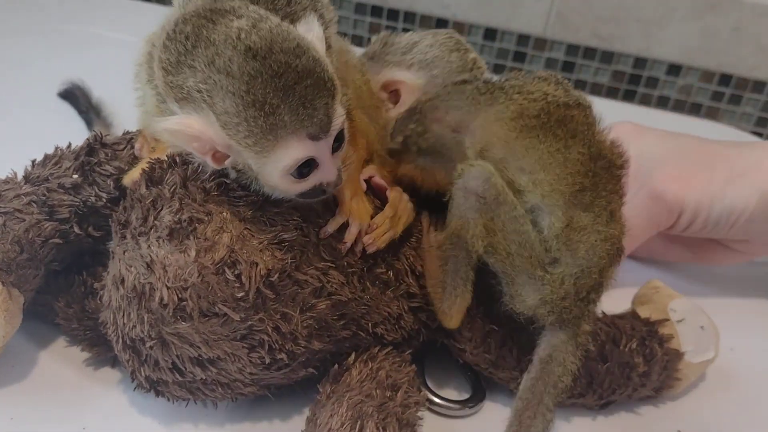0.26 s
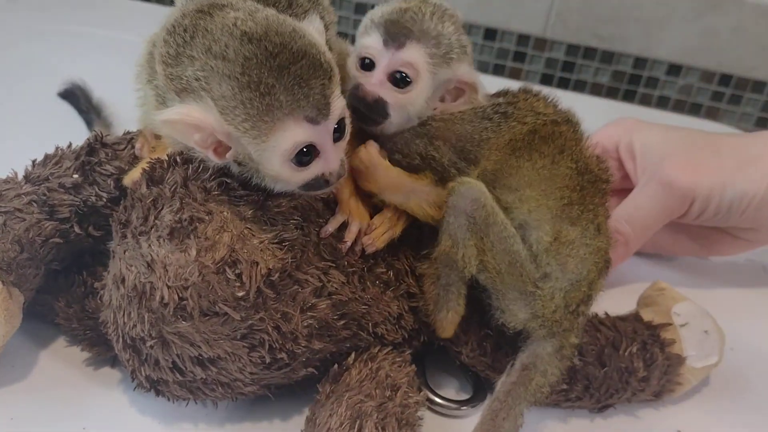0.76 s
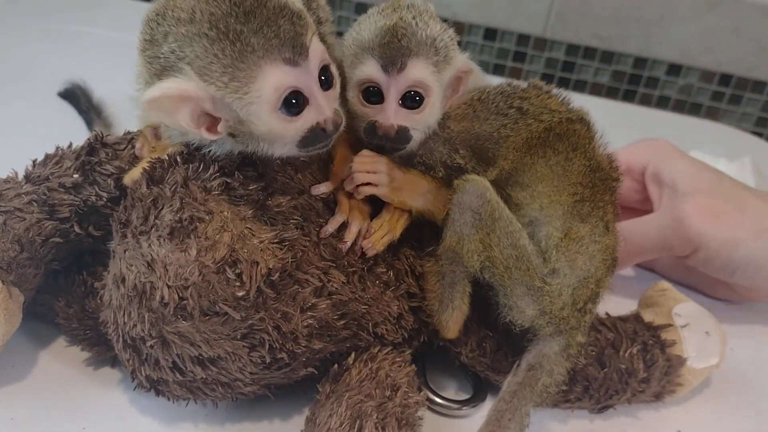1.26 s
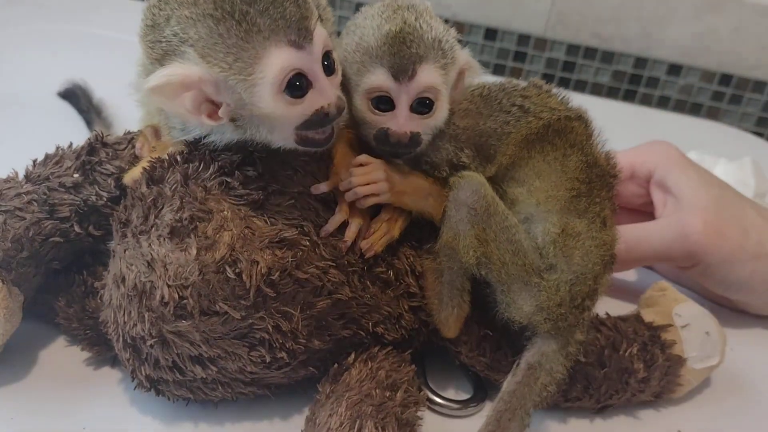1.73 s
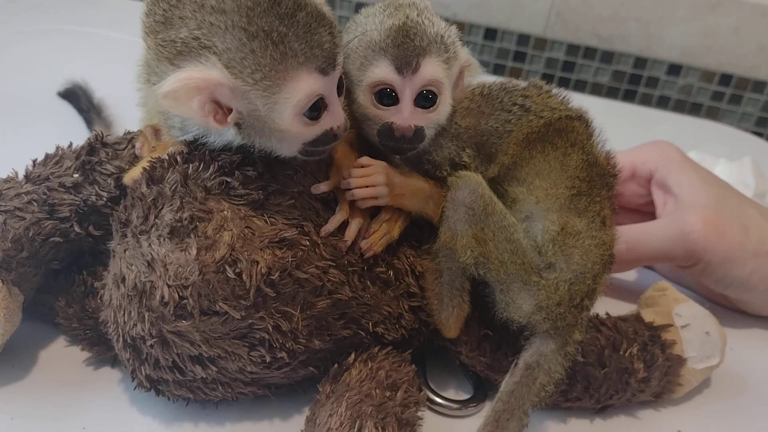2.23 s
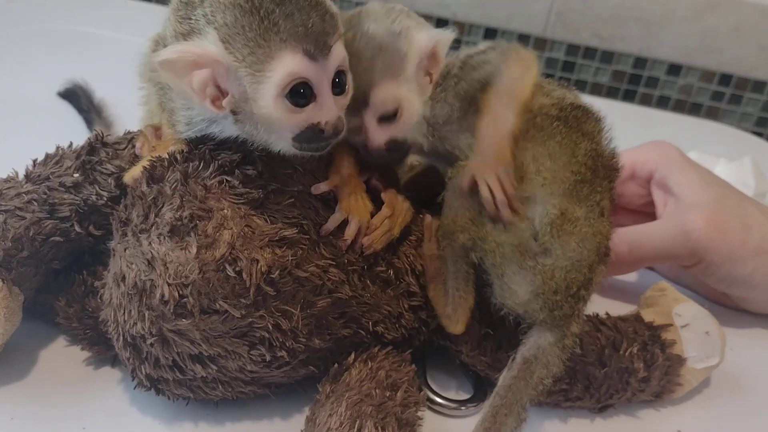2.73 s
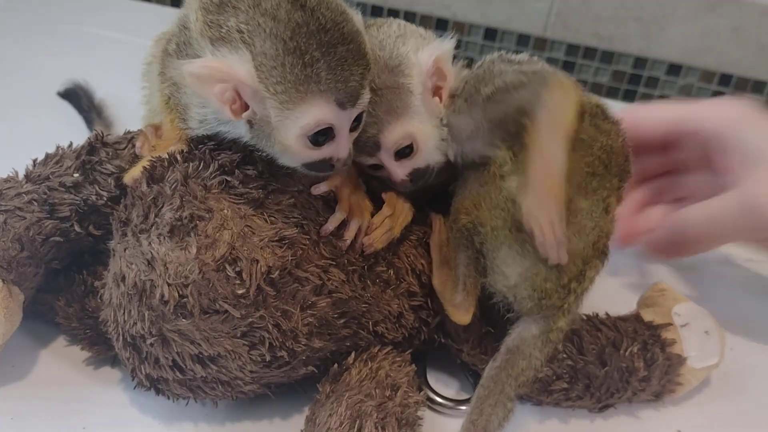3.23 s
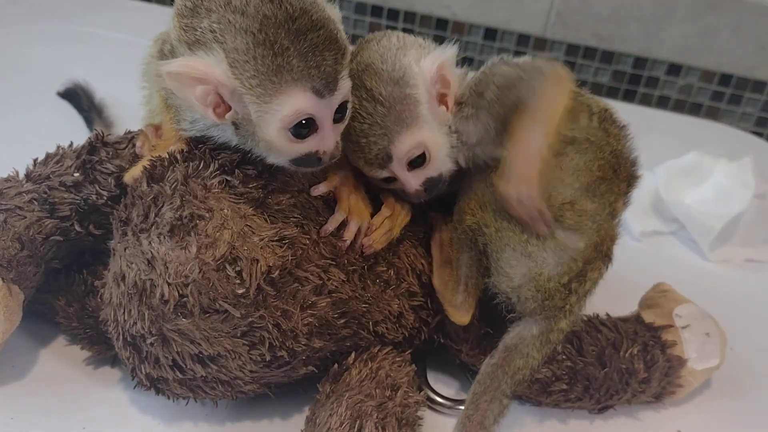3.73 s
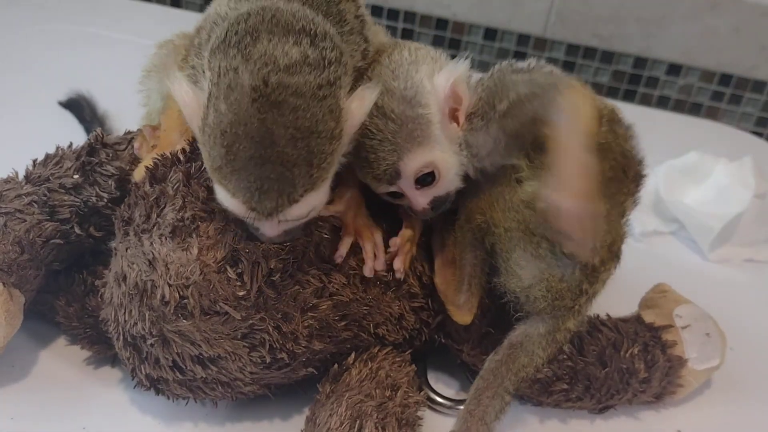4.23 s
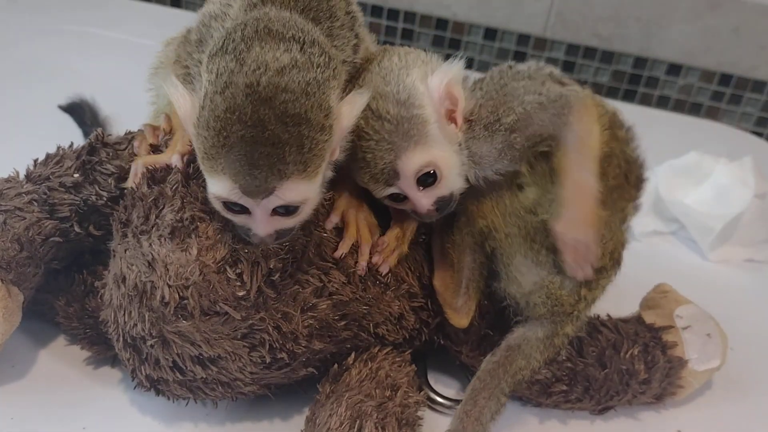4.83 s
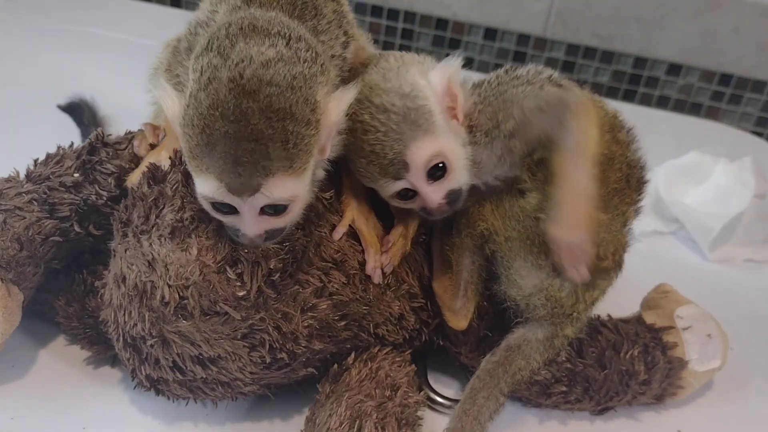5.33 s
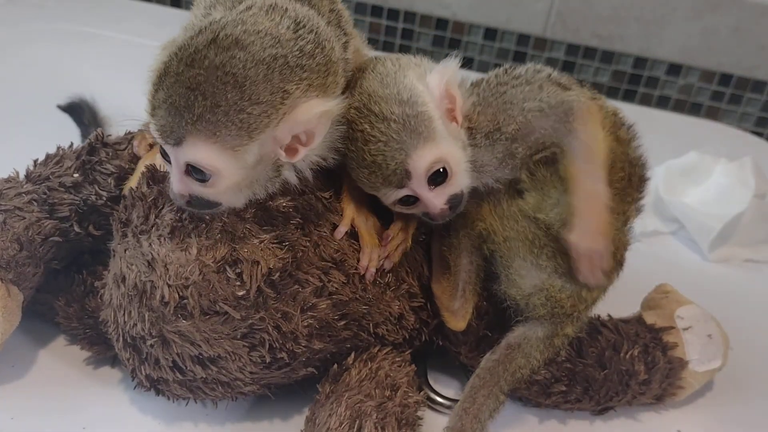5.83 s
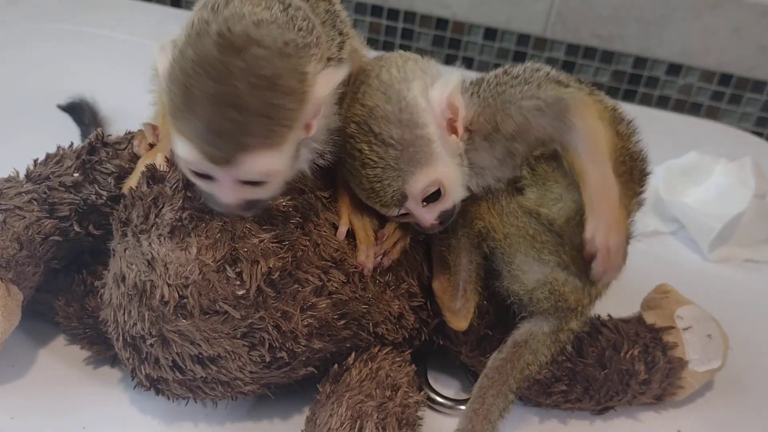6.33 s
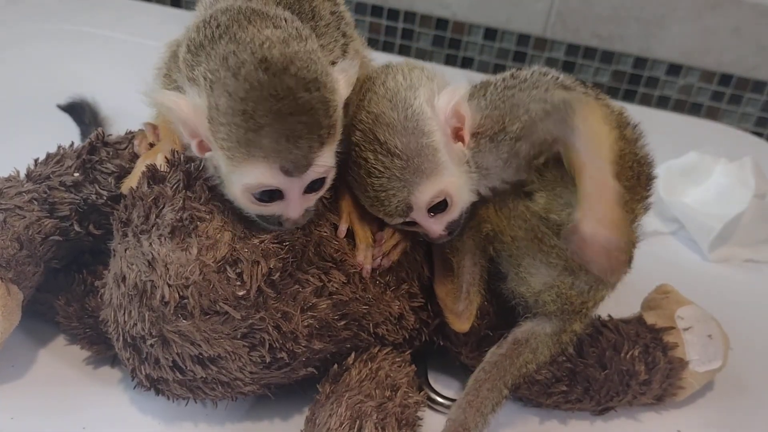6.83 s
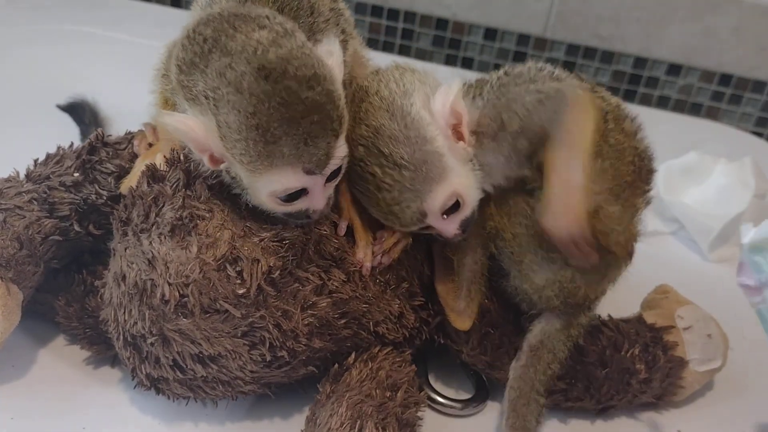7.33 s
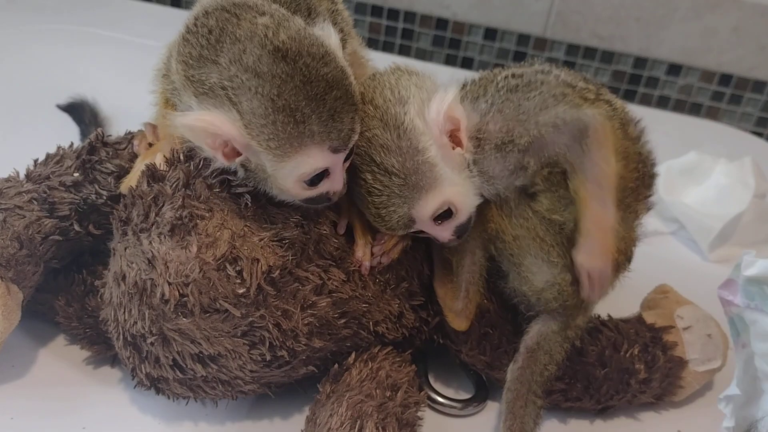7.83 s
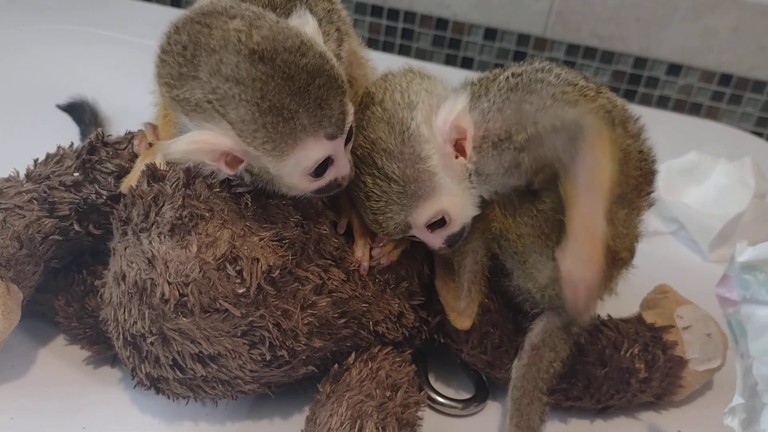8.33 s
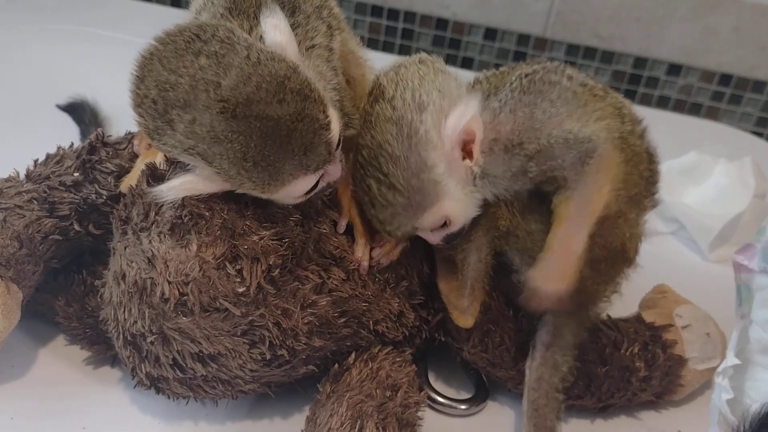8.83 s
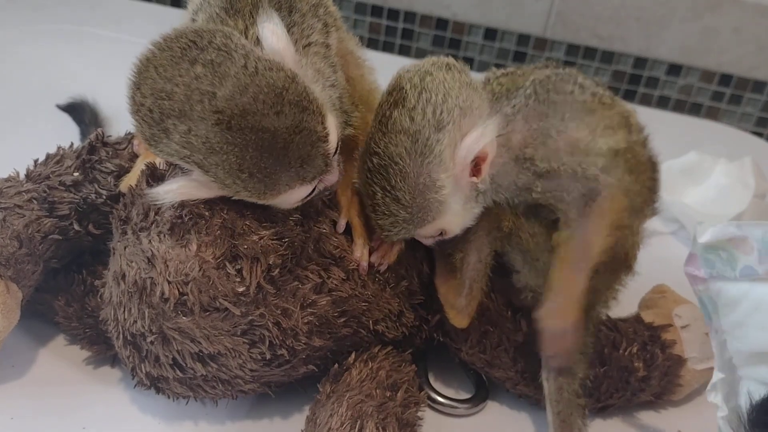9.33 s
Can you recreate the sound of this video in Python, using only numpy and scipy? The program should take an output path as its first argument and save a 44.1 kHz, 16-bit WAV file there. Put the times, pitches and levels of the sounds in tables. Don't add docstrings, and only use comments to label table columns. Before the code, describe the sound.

A small tiled washroom, close stereo pickup, faint ventilation rush with low wavering fan hum throughout. At 0 and 0.9 s, infant monkeys give soft, buzzy low grunts; at 1.4 s a dull bump sounds on a hollow basin. From 1.8 to 2.6 s comes a cluster of four tiny, nearly pure whistles, very high, the loudest near 2.5 s, followed by a higher, longer one, with bright scratching of fur. A creaky grunt at 3.4 s leads into dry claw rustle and scattered ticks until about 5.4 s, then a lull. From 6.2 to 6.9 s weight drags, squeaks, clacks and thuds on the basin, with three short peeps. Scratching returns at 7.2 s, strongest near 7.7. At 8.2 s a sharp falling chuck turns raspy, followed at once by a breathy grunt. Duller rubbing and fine snaps dwindle to 9.5 s. Every call leaves a brief tile echo.

```python
import sys
import numpy as np
from scipy import signal
from scipy.fft import rfft, irfft
from scipy.io import wavfile
from scipy.ndimage import uniform_filter1d

SR = 44100
rng = np.random.default_rng(int(sys.argv[2]) if len(sys.argv) > 2 else 0)


def unload_wav(signal):
    wavfile.write(
        sys.argv[1],
        SR,
        np.round(np.clip(np.atleast_2d(signal).T, -1, 1) * 32767).astype(np.int16),
    )


def ratio_of_db(decibels):
    return 10 ** (np.asarray(decibels, float) / 20)


N = 422919

ATTACK_S = 0.005

# (pitch [Hz], width [Hz], level [dB])
BASIN_WALL = [(580, 350, 3), (998, 700, -1), (1800, 1100, -5)]
# (pitch [Hz], width [Hz], level [dB])
BASIN_GLAZE = [(2660, 600, 3), (3180, 700, -2), (4180, 2100, -10.5)]


def unit(x):
    return x / np.sqrt(np.mean(x ** 2))


def along(table, hz):
    table_hz, value = np.transpose(table)
    return np.interp(np.log(hz + 1), np.log(table_hz), value)


def unroll(table):
    s, *columns = np.transpose(table)
    t = np.arange(s[0], s[-1], 1 / SR)
    return [np.interp(t, s, column) for column in columns]


def walk(rate, size=N):
    k = int(SR / rate)
    goals = rng.standard_normal(size // k + 1)
    return uniform_filter1d(np.repeat(goals, k), k)[:size]


def strokes(rows):
    s, db, rise_s, fade_s = np.transpose(rows)[:, :, None]
    t = np.arange(0, N, 64) / SR
    below_peak_db = 20 * np.maximum((s - t) / rise_s, (t - s) / fade_s)
    power = ratio_of_db(2 * (db - below_peak_db)).sum(axis=0)
    return np.interp(np.arange(N) / SR, t, 10 * np.log10(power + 1e-13))


def ring(x, modes):
    out = 0
    for k, (hz, width, db) in enumerate(modes):
        peak = signal.tf2sos(*signal.iirpeak(hz, hz / width, fs=SR))
        out = out + (-1) ** k * ratio_of_db(db) * signal.sosfilt(np.vstack([peak, peak]), x)
    return out


def diffuse(size):
    # (pitch [Hz], likeness [-1 to 1])
    likeness = [(60, .87), (290, .7), (640, 0.2), (1400, -0.026), (2500, .0)]
    like = np.clip(along(likeness, np.fft.rfftfreq(size, 1 / SR)), -1, 1)
    noise = rfft(rng.standard_normal((2, size)))
    mid, side = noise * np.sqrt((1 + np.array([like, -like])) / 2)
    return irfft(np.array([mid + side, mid - side]), size)


def tiles(size=16384):
    # (pitch [Hz], time [s])
    fade_times = [(300, 0.26), (2000, 0.31), (6000, 0.24), (12000, 0.2013)]
    # (pitch [Hz], level [dB])
    echo_tone = [(500, -1), (2000, -0.5), (3500, -4.5), (6000, .0), (12000, -1)]
    hz, t = np.fft.rfftfreq(size, 1 / SR), np.arange(size) / SR
    echoes = rfft(diffuse(size)) * ratio_of_db(along(echo_tone, hz))
    bands = 250 * 4. ** np.arange(4)
    fades = ratio_of_db(-60 * t / along(fade_times, bands)[:, None])
    tail = 0
    for row, fade in zip(np.eye(4), fades):
        share = np.interp(np.log(hz + 1), np.log(bands), row)
        tail = tail + irfft(echoes * share, size) * fade
    tail = tail * np.clip((t - .009) / .003, 0, 1)
    return tail / np.sqrt(np.sum(tail ** 2) / 2)


def heard(x, pan_db, lag_ms, room_db, tail):
    rim_db, rim_lag = -9, 225
    side = np.array([[.5], [-.5]])
    delay = np.sinc(np.arange(-32, 32) - side * lag_ms * SR / 1000) * np.hanning(64)
    direct = ratio_of_db(side * pan_db) * delay
    path = ratio_of_db(room_db) * tail
    path[:, :64] += direct
    path[:, rim_lag:rim_lag + 64] += ratio_of_db(rim_db) * direct[::-1]
    return signal.oaconvolve(x[None], path, axes=1)[:, 32:]


def add(out, start_s, x):
    i = int(start_s * SR)
    out[:, i:i + x.shape[1]] += x[:, :N - i]


def ventilation():
    # (pitch [Hz], level per Hz [dB])
    air_colour = [(20, -28), (40, -6.5), (65, -1.5), (100, -3.5), (160, -8.5), (250, -10), (500, -11.5),
                  (1000, -14.5), (2000, -21.5), (4000, -29.5), (8000, -31), (13000, -33.5), (16000, -35)]
    # (pitch [Hz], level [dB], waver [dB])
    fan_tones = [(74.2, -76, 3), (136.4, -73, 2), (180, -78.5, 2), (299.4, -80, 3)]
    colour = ratio_of_db(along(air_colour, np.fft.rfftfreq(N, 1 / SR)))
    air = unit(irfft(rfft(diffuse(N)) * colour, N))
    tones = 0
    for hz, db, waver_db in fan_tones:
        level = np.sqrt(2) * ratio_of_db(db + waver_db * walk(14))
        tones = tones + level * np.sin(2 * np.pi * np.cumsum(hz + 1.8 * walk(11)) / SR)
    return ratio_of_db(-66 + 0.55 * walk(1.5)) * air + ratio_of_db(np.array([[.6], [-.6]])) * tones


def scratching():
    # (pitch [Hz], level per Hz [dB])
    fur_colour = [(470, -39.5), (800, -13.5), (1180, -9.5), (1290, -10), (1630, -9.5), (2290, -5),
                  (2600, -6.5), (3220, -6), (4130, -6), (7360, -9), (9100, -14), (10600, -12.5),
                  (13400, -16), (15200, -21), (16000, -27)]
    # (pitch [Hz], width [Hz], level [dB])
    pile_bands = [(2300, 200, 4), (3720, 300, 2)]
    # (peak time [s], peak level [dB], 20 dB rise [s], 20 dB fade [s])
    claw_strokes = [(.59, -81, .05, .15), (1.9, -69, .03, .3), (2.235, -60, .25, .06), (2.47, -60, .05, .4),
                    (2.7, -63, .4, .2), (3.268, -66.5, .03, .2), (3.56, -67, .2, .25),
                    (3.755, -66, .02, .3), (3.885, -65, .03, .15), (3.995, -64.5, .05, .4),
                    (4.095, -67, .02, .3), (4.23, -67, .3, .4), (4.42, -66, .03, .45), (7.54, -61, .15, .1),
                    (4.6, -64, .3, .15), (4.9, -72.5, .15, .1), (5.18, -68, .25, .25),
                    (5.35, -65, .015, .08), (5.6, -70, .3, .2), (7.056, -75, .01, .06),
                    (7.23, -63.5, .15, .35), (7.675, -52, .2, .04), (7.62, -59, .06, .1),
                    (7.82, -59, .012, .1), (7.848, -57.5, .05, .14), (7.737, -62, .012, .07),
                    (7.97, -62, .1, .15), (8.075, -61, .06, .05), (8.472, -66, .015, .07),
                    (8.748, -64.5, .15, .25), (8.98, -69, .1, .4), (9.168, -67.5, .05, .08),
                    (9.41, -75, .15, .3)]
    # (time [s], steady rubbing level [dB], depth [0-1])
    rubbing = [(0, -95, .2), (1.8, -95, .2), (2.0, -69, .3), (2.3, -80, 0), (2.65, -71, .25),
               (2.95, -77, .2), (3.2, -82, .3), (3.77, -72, .7), (3.95, -75, .5), (4.7, -73, .6),
               (4.85, -82, .6), (5.7, -83, .55), (5.9, -95, .4), (7.0, -95, .4), (7.6, -78, .55),
               (7.9, -79, 1), (8.5, -78, .85), (9.6, -81, 1)]
    hz = np.fft.rfftfreq(N, 1 / SR)
    rub_db, depth = (column[:N] for column in unroll(rubbing))
    level_db = 10 * np.log10(ratio_of_db(2 * rub_db) + ratio_of_db(2 * strokes(claw_strokes)))
    dull_db = -7 + 17 * depth
    bright_db = 4 - 27 * depth

    clicks = ratio_of_db(2.0 * np.minimum(rng.exponential(size=N), 8))
    slips = diffuse(N) * clicks * ratio_of_db(1.8 * walk(45) + 1.8 * walk(250))
    colour_db = along(fur_colour, hz)
    for mid_hz, width, db in pile_bands:
        colour_db = colour_db + db / (1 + (2 * (hz - mid_hz) / width) ** 2)
    fur = rfft(slips) * ratio_of_db(colour_db)

    dull = 1 / (1 + (hz / 3700) ** 6)
    bright = 1 / (1 + (8000 / (hz + 1)) ** 6)
    # (share of the spectrum, band that sets its level: from Hz, to Hz, level dB)
    shades = [(dull, 1500, 3500, dull_db), (1 - dull - bright, 4000, 6500, 0),
              (bright, 13200, 15000, bright_db)]
    out = 0
    for share, lo, hi, shade_db in shades:
        inside = np.sqrt(np.mean(irfft(fur * share * (hz > lo) * (hz < hi), N) ** 2))
        out = out + irfft(fur * share, N) / inside * ratio_of_db(level_db + shade_db)
    return out


def hair_snaps():
    # (time [s], peak level [dB], pitch [Hz], left minus right [dB])
    snaps = [(0.4894, -64, 10500, 6), (1.178, -63, 5500, 0), (1.8914, -60, 6750, -1.5),
             (2.161, -42.5, 6130, 3), (3.5229, -45.5, 1730, -6), (3.6372, -46.5, 1630, -7),
             (3.7128, -54, 1590, -5), (3.7532, -41, 7000, -4), (3.8786, -44, 6070, -3.5),
             (3.9877, -54, 6600, -18), (4.0562, -47, 2190, -11), (4.0924, -47.5, 3380, -7),
             (4.4167, -39, 2310, -12), (4.5385, -50, 2350, 0), (4.5719, -48, 2630, 0),
             (4.6113, -42, 2270, 7), (4.758, -50, 2250, 0), (5.1755, -54, 5170, 0), (5.3102, -59, 6770, 0),
             (5.3227, -55, 3860, 0), (5.3481, -42, 2550, -3.5), (7.0565, -59, 3020, 7),
             (7.7326, -43, 3630, -9), (7.812, -44, 4500, -4), (7.8208, -38, 2300, -4),
             (7.9496, -44, 3640, -13), (7.9647, -42, 2270, -6.5), (8.025, -44, 2300, 3),
             (8.079, -42, 2340, 4), (8.1359, -47, 2470, -6), (8.4722, -45.5, 4000, -5),
             (8.6138, -58, 1980, 3), (8.7755, -48.5, 3150, -3.5), (8.7944, -48, 2270, 5),
             (8.896, -50, 2300, 5), (8.9695, -56, 2310, 0), (9.0995, -49.5, 3560, 0)]
    out = np.zeros((2, N))
    t, tail = np.arange(1500) / SR, tiles(size=8192)
    for s, peak_db, hz, pan_db in snaps:
        tick = np.sin(2 * np.pi * hz * t) * np.exp(-t / 0.001)
        click = .35 * rng.standard_normal(len(t)) * np.exp(-t / 0.00028)
        hiss = ring(rng.standard_normal(len(t)), [(hz, 2500, 0), (7000, 9000, -3.5)])
        swish = ratio_of_db(-19) * unit(hiss) * np.exp(-t / .013)
        snap = ratio_of_db(peak_db + 3.0) * (0.99 * (tick + click) + 1.07 * swish)
        add(out, s, heard(snap, pan_db, .3, -2.8, tail))
    return out


def dragging():
    # (peak time [s], peak level [dB], 20 dB rise [s], 20 dB fade [s], glaze squeak [dB])
    shoves = [(1.438, -50.5, .003, .1, -26), (6.068, -68, .02, .4, 2), (6.25, -60, .008, .05, 5),
              (6.27, -46.5, .025, .07, 5), (6.305, -45, .06, .07, -8), (6.389, -43.5, .003, .04, -9),
              (6.5, -76, .2, .3, -4), (6.606, -57.5, .007, .035, -13), (6.68, -57, .006, .06, -2),
              (6.704, -49, .04, .01, -16), (6.718, -44, .015, .05, -3), (6.76, -54, .05, .07, -9),
              (6.843, -65, .02, .08, -1), (6.92, -70, .08, .04, -5)]
    # (pitch [Hz], width [Hz], level [dB])
    hollow_modes = [(86.1, 44, -7.5), (235, 40, 1.5), (324, 80, -4.5)]
    # (peak time [s], peak level [dB], 20
    # dB rise [s], 20 dB fade [s])
    heaves = [
        (3.44, -67, .06, .06),
        (8.3, -65, .06, .1),
        (1.44, -53, .005, .09),
        (6.15, -64, .2, .4),
        (6.325, -44.5, .05, .05),
        (6.393, -46, .006, .04),
        (6.5, -64, .1, .2),
        (6.75, -46, .08, .06),
        (6.89, -57, .12, .05),
    ]
    wall_db = strokes([row[:4] for row in shoves])
    squeaks = [(s, peak_db + squeak_db, rise_s, fade_s) for s, peak_db, rise_s, fade_s, squeak_db in shoves]
    glaze_db = strokes(squeaks)
    jolts = rng.standard_normal((3, N)) * ratio_of_db(1.8 * rng.exponential(size=(3, N)))
    wall = ratio_of_db(wall_db) * unit(ring(jolts[0], BASIN_WALL))
    glaze = ratio_of_db(glaze_db + 2.5 * walk(150)) * unit(ring(jolts[1], BASIN_GLAZE))
    hollow = ratio_of_db(strokes(heaves)) * unit(ring(jolts[2], hollow_modes))
    return ratio_of_db(0.2) * heard(wall + glaze + hollow, .6, -.3, -6.5, tiles())[:, :N]


def knocking():
    # (time [s], peak level [dB], wall clack [dB], thud pitch [Hz], thud width [Hz])
    knocks = [(1.4365, -45, -16, 420, 250), (1.443, -44, -20, 450, 250), (1.451, -43, -20, 330, 200),
              (1.467, -48, -18, 400, 200), (1.487, -44, -22, 300, 200), (6.2705, -46, 14, 700, 400),
              (6.276, -50, 10, 700, 400), (6.306, -44, -10, 240, 80), (6.318, -44, -8, 240, 80),
              (6.389, -40, -3, 235, 50), (6.605, -51, -4, 235, 50), (6.679, -49, 6, 235, 50),
              (6.794, -58.5, -25, 235, 50), (6.843, -52.5, -7.5, 235, 50), (6.887, -52, -16, 235, 50)]
    out = np.zeros((2, N))
    blow = np.exp(-np.arange(4000) / SR / 0.0014)
    soft_blow = signal.lfilter(np.hanning(40), 1, blow)
    clack, tail = ring(np.diff(blow, prepend=0), BASIN_WALL + BASIN_GLAZE), tiles(size=8192)
    for s, peak_db, clack_db, thud_hz, width in knocks:
        thud = signal.lfilter(*signal.iirpeak(thud_hz, thud_hz / width, fs=SR), soft_blow)
        knock = thud / thud.max() + ratio_of_db(clack_db) * clack / clack.max()
        add(out, s, heard(ratio_of_db(peak_db) * knock, .6, -0.24, -10.5, tail))
    return out


def voice(table, throat, jitter, slope_db, shimmer_db):
    creak_from = .7
    hz, db, rasp = unroll(table)
    size = len(hz)
    rasp = np.clip(rasp, 0, 1)
    creak = np.clip((rasp - creak_from) / (1 - creak_from), 0, 1)
    span = int(SR / hz.min()) + 1
    waver = uniform_filter1d(rng.standard_normal(size), span) * np.sqrt(span)
    turn = 2 * np.pi * np.cumsum(hz * (1 + jitter * rasp * waver)) / SR

    order = np.arange(1, 31)[:, None]
    tilt_db = slope_db + .5 * (db - db.max())
    swell = np.array([walk(120, size=size) for _ in order])
    shimmer = shimmer_db * swell * (order > 1) - 25 * creak * (order == 1)
    audible = order * hz < .45 * SR
    overtones = ratio_of_db(tilt_db * np.log2(order) + shimmer) * np.cos(order * turn) * audible
    folds = unit(np.sum(overtones, axis=0))

    air = rng.standard_normal(size) * (1 + 0.61 * np.cos(turn))
    air = signal.sosfilt(signal.butter(2, 900, "high", fs=SR, output="sos"), air)
    beat = 1 - creak + 1.7 * creak * np.cos(turn / 4) ** 2
    source = beat * (np.sqrt(1 - rasp) * folds + np.sqrt(rasp) * air)
    to_end = np.minimum(np.arange(size), np.arange(size)[::-1])
    edges = np.clip(to_end / (.003 * SR), 0, 1)
    return ratio_of_db(db) * edges * unit(ring(source, throat))


def grunts():
    # (time [s], pitch [Hz], effort [dB], rasp [0-1])
    grunt_lines = [
        [(.026, 670, -57, .05), (.040, 605, -53.5, .05), (.059, 583, -48, .05), (.075, 585, -52, .1),
         (.09, 587, -51, .15), (.098, 570, -43.5, .3), (.106, 590, -51, .3), (.122, 585, -53, .3),
         (.134, 585, -62, .4)],
        [(.930, 600, -55, .04), (.948, 548, -47, .05), (.97, 525, -44, .12), (.982, 515, -43, .15),
         (.992, 530, -41, .35), (1.0, 545, -41.5, .55), (1.008, 560, -48, .5)],
        [(3.374, 590, -51, .6), (3.39, 575, -46.5, .6), (3.404, 565, -45.5, .7), (3.411, 540, -45, .95),
         (3.428, 510, -41.5, .95), (3.435, 520, -43, .7), (3.447, 530, -43, .4), (3.458, 550, -56, .3)],
        [(8.225, 720, -44, .1), (8.233, 647, -52, .12), (8.242, 620, -46.5, .15)],
        [(8.278, 561.5, -44, .3), (8.289, 567.4, -35.5, .55), (8.298, 607, -35.5, .55), (8.305, 600, -62, .7)],
    ]
    # (pitch [Hz], width [Hz])
    grunt_throat = [(580, 1040), (1150, 630), (1900, 1000), (4100, 1440), (6000, 1530), (11800, 1900)]
    # (strength of each throat resonance in turn [dB], ...)
    mouth_shapes = [(1, -4, 6.5, -2, -3, -22), (1, -3.5, 7.5, -7, -5.5, -6), (5, -11, 10.5, -4, -1, -2),
                    (0, -14, -18.5, -33.5, -30, -37), (2, -9, 11, 5, -7, -9.5)]
    # (stretch of upper resonances [ratio], left minus right [dB], room level [dB])
    grunt_seats = [(0.97, 6, -6.5), (0.985, 2, -11), (1.04, 5, -11.5), (1.2, -1, -8), (1.145, 5, -8)]
    out = np.zeros((2, N))
    for line, mouth, (stretch, pan_db, room_db) in zip(grunt_lines, mouth_shapes, grunt_seats):
        throat = []
        for (hz, width), db in zip(grunt_throat, mouth):
            throat.append((hz * (stretch if hz > 1500 else 1), width, db))
        call = voice(line, throat, 0.08, -1.6, 4.5)
        add(out, line[0][0], heard(call, pan_db, -0.14, room_db, tiles()))
    return out


def peep(table, octave_db):
    release_s, hush_db = .004, -36
    frail_db, flutter_db, flutter_hz = -36, 4, 120
    (s0, hz0, db0), (s1, hz1, db1) = table[0], table[-1]
    table = [(s0 - ATTACK_S, hz0, db0 + hush_db), *table, (s1 + release_s, hz1, db1 + hush_db)]
    lines = np.array(unroll(table))
    for _ in range(2):
        lines = uniform_filter1d(lines, size=70, axis=1, mode="nearest")
    hz, db = lines
    frail = np.clip((frail_db - db) / 10, 0, 1)
    pitch = hz + flutter_hz * frail * walk(180, size=len(hz))
    level_db = db + flutter_db * frail * walk(180, size=len(hz))
    turn = 2 * np.pi * np.cumsum(pitch) / SR
    octave = ratio_of_db(octave_db) * np.sin(2 * turn) * (2 * hz < .45 * SR)
    return np.sqrt(2) * ratio_of_db(level_db) * (np.sin(turn) + octave)


def chuck():
    # (time [s], pitch [Hz], level [dB], rasp [0-1])
    chuck_line = [(8.212, 8040, -50, 0), (8.2153, 7280, -18.5, .0), (8.221, 5720, -15.5, .0),
                  (8.2245, 5030, -20, 0.0), (8.2262, 3900, -18, 0.3), (8.2295, 3400, -24, .3),
                  (8.2325, 3320, -14.5, 0.4), (8.236, 3250, -21, .4), (8.24, 3200, -17, 0.35),
                  (8.2445, 3200, -22, 0.5), (8.248, 3200, -51.5, .2)]
    # (pitch [Hz], width [Hz], level [dB])
    chuck_throat = [(3250, 1400, -5.5), (5270, 1500, 1.5), (6900, 2900, 1.5), (10700, 2000, 2),
                    (15000, 2000, -14)]
    # (time [s], pitch [Hz], level [dB])
    split_line = [(8.2255, 5050, -24), (8.229, 5900, -27), (8.233, 6600, -20), (8.24, 6900, -21),
                  (8.245, 6600, -28)]
    out = np.zeros((2, N))
    call = voice(chuck_line, chuck_throat, 0.27, -1.1, 2.0)
    add(out, chuck_line[0][0], heard(call, 3, 0.064, -8, tiles()))
    add(out, split_line[0][0] - ATTACK_S, heard(peep(split_line, -28), 3, 0.064, -9, tiles()))
    return out


def peeps():
    # (time [s], pitch [Hz], level at the mouth [dB])
    peep_lines = [
        [(1.781, 7676, -32), (1.794, 8040, -24.5), (1.806, 8540, -19.5)],
        [(2.046, 8900, -61), (2.122, 9150, -53), (2.131, 9150, -40), (2.158, 8960, -45.5), (2.167, 8350, -21)],
        [(2.462, 9200, -13), (2.470, 9300, -11), (2.478, 9600, -17), (2.487, 10200, -23)],
        [(2.516, 11450, -27), (2.528, 11400, -18), (2.536, 11500, -23), (2.543, 12000, -22),
         (2.556, 12150, -18), (2.582, 11900, -19)],
        [(6.582, 9700, -27), (6.591, 9760, -24), (6.598, 10300, -22)],
        [(6.79, 11100, -30), (6.799, 10800, -29), (6.805, 10870, -33)],
        [(6.885, 10500, -25), (6.896, 9870, -15), (6.914, 9350, -25)],
    ]
    # (left minus right [dB], left lag [ms], octave level [dB], room level [dB])
    peep_seats = [(9.5, 0.09, -20, -4), (1, 0.022, -31, -4), (4, 0.066, -43.5, -5), (9, .1, -44, -2.5),
                  (1, 0.035, -34, -6), (-10.5, .0, -40, -3), (-3, 0.028, -41, -4.5)]
    out = np.zeros((2, N))
    for line, (pan_db, lag_ms, octave_db, room_db) in zip(peep_lines, peep_seats):
        call = heard(peep(line, octave_db), pan_db, lag_ms, room_db, tiles())
        add(out, line[0][0] - ATTACK_S, call)
    return out


def scene():
    fur = scratching() + hair_snaps()
    basin = dragging() + knocking()
    calls = grunts() + chuck() + peeps()
    return ventilation() + fur + basin + calls


def roll_off(x):
    return signal.sosfilt(signal.butter(12, 16990, fs=SR, output="sos"), x)


def record(dry):
    top_cut = signal.ellip(10, .3, 60, 15720, fs=SR, output="sos")
    mix = signal.sosfilt(top_cut, dry)
    return roll_off(mix)


dry = scene()
out = record(dry)
unload_wav(out)
```